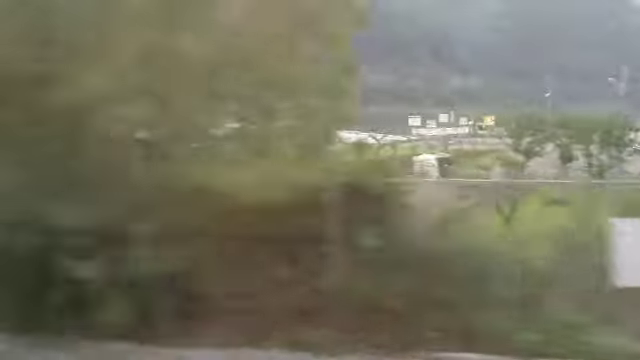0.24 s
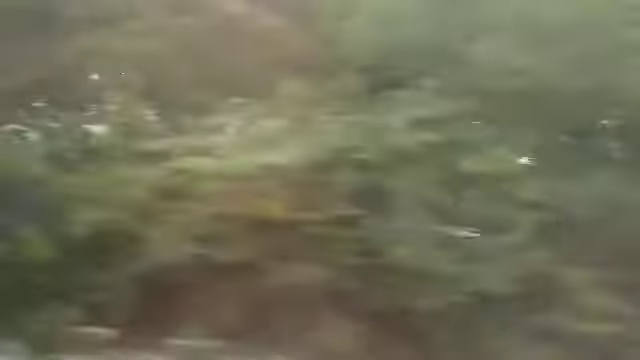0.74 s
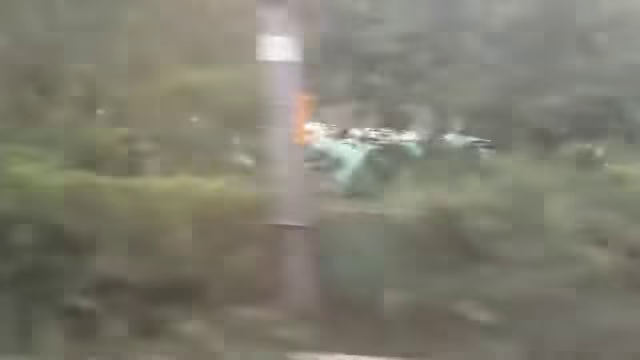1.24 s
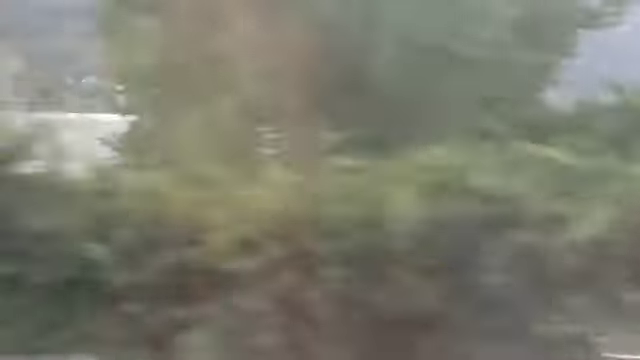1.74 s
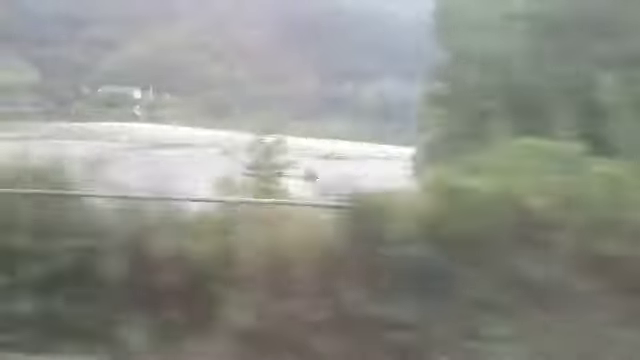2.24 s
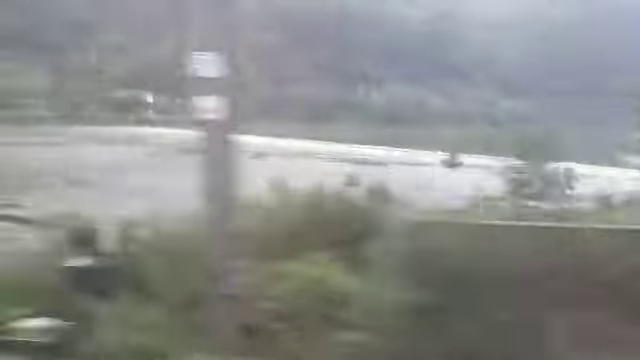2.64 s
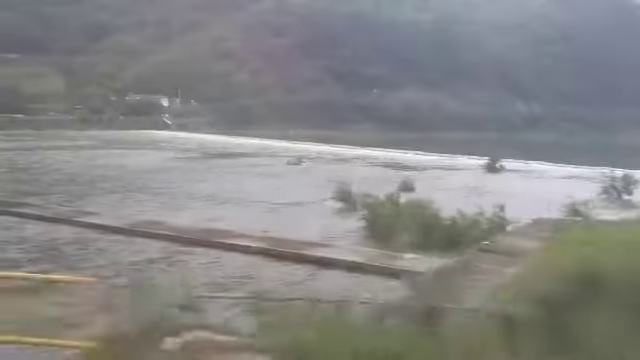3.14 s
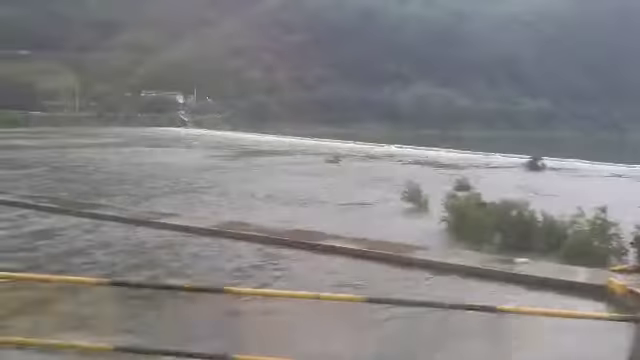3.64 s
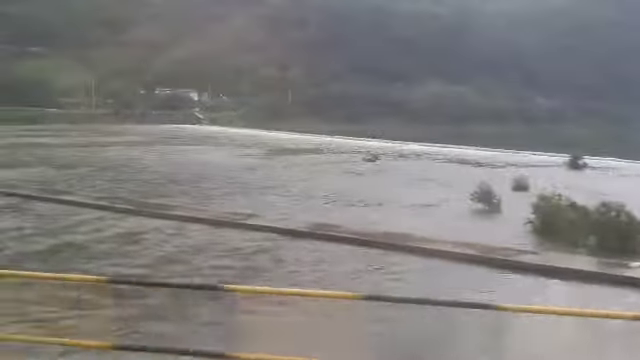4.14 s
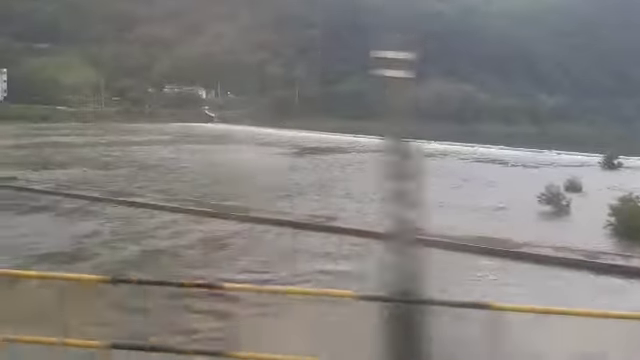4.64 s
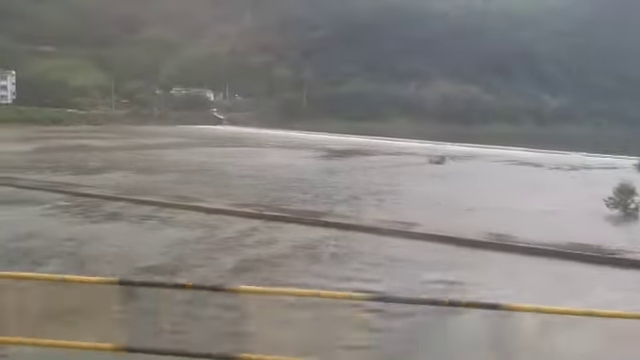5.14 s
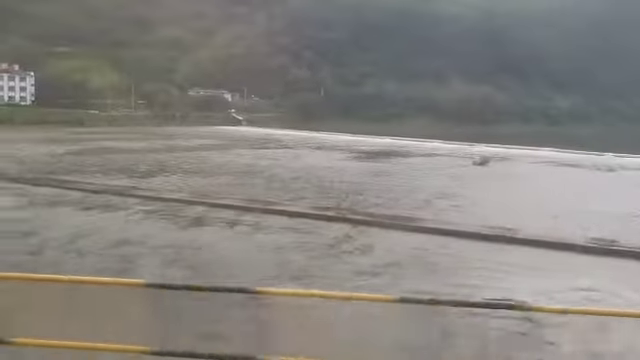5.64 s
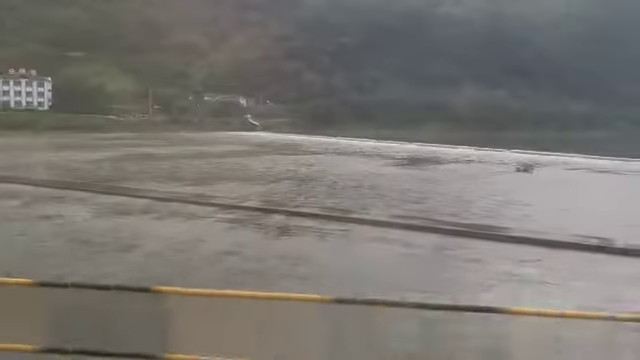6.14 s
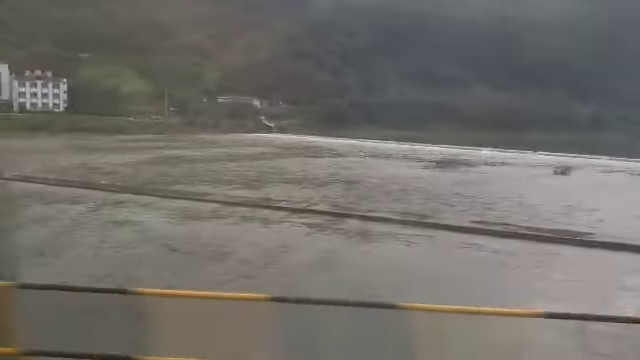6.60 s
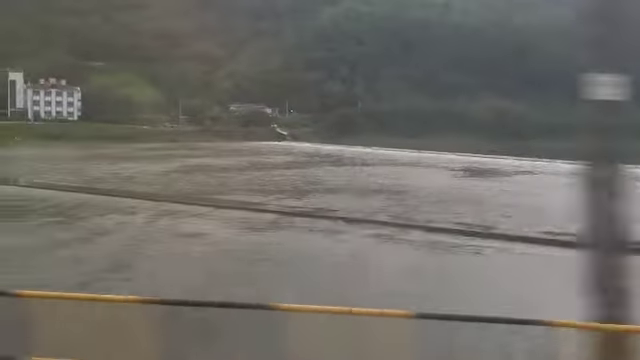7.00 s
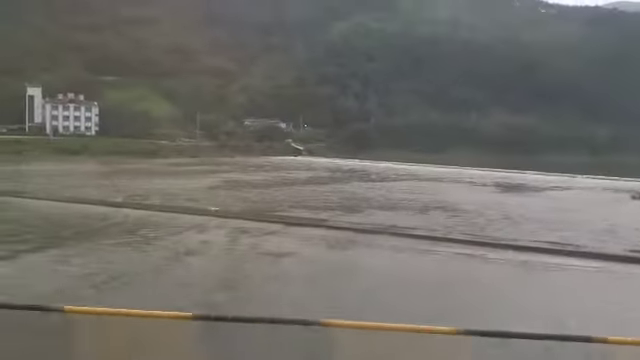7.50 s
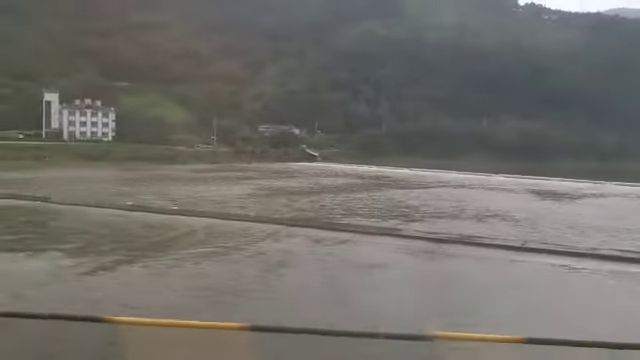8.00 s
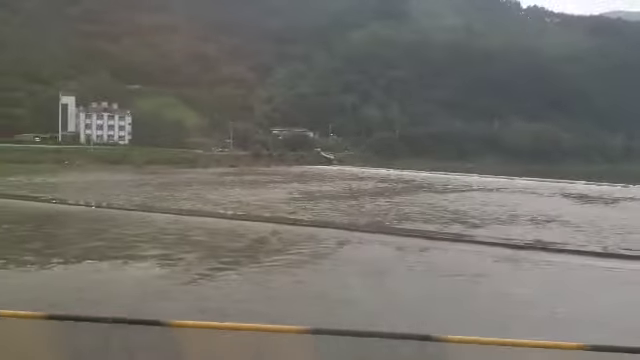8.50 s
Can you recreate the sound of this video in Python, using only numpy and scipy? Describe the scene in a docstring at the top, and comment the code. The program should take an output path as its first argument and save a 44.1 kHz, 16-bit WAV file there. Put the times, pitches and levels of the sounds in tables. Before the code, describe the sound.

Inside a fast passenger train, wheels on rails give a steady low rumble with uneven booming surges and a low drive hum.

```python
"""Passenger coach at speed, inside, running past trees and out along a river.
The wheels shake the body; its lowest air mode booms in surges under a steady rumble and rolling roar.
The drive hums on multiples of its shaft speed and eases after 3 s; a thin whine climbs.
Soft rustles and scuffs, a few ticks and short squeaks sound in the cabin."""
import sys
import numpy as np
from scipy import signal
from scipy.fft import rfft, irfft, next_fast_len
from scipy.io import wavfile
from scipy.ndimage import uniform_filter1d

SR = 44100
rng = np.random.default_rng(int(sys.argv[2]) if len(sys.argv) > 2 else 0)


def unload_audio(sound):
    """Save the sound as a 16-bit wav file, at the path given as the first command line argument."""
    columns = np.transpose(np.atleast_2d(sound))
    # keep every value between -1 and 1, then stretch to whole-number steps
    steps = np.round(np.clip(columns, -1, 1) * 32767)
    wavfile.write(sys.argv[1], SR, steps.astype(np.int16))


N = 386316
TIME_S = np.arange(N) / SR

# noise spectra: freq_hz, gain_db
RUSTLE_SPECTRUM = [(2000, -18), (3800, 0), (5400, 0), (7000, 1.5), (8500, -3.5), (10200, -3), (12000, -14)]
CONTACT_SPECTRUM = [(800, -4), (1600, -7), (2500, 6), (5000, -0.5), (8000, -1.5), (10500, 0.5),
                    (12000, -12)]
AIR_SPECTRUM = [(500, -2), (900, 4), (1130, 5), (1300, 2.5), (1550, 1.5), (2000, 1), (2300, 0),
                (2750, -2.5), (3300, -6.5), (4200, -11.5), (6000, -16), (11000, -27)]
ROAR_SPECTRUM = [(250, -13), (400, -2.5), (455, -4.5), (492, 3), (530, -1.5), (620, -3), (710, -4.5),
                 (860, -17.5), (1000, -21), (1500, -30.5), (3000, -58.5)]
RUMBLE_SPECTRUM = [(24, -23.5), (40, 1), (80, 4), (98, -2), (120, 1), (142, -2), (165, -8.5), (245, -5.5),
                   (305, -4), (355, -4), (390, -10.5), (450, -17.5), (700, -43)]

# cabin rustles: centre_s, level_db, half_length_s
RUSTLES = [(0.03, -61, 0.12), (1.547, -63, 0.11), (2.25, -64, 0.34), (2.665, -62, 0.11),
           (3.01, -65.5, 0.09), (3.532, -66, .05), (3.893, -60.5, 0.081), (4.418, -62.5, 0.11),
           (4.652, -59.5, .12), (5.046, -60.5, 0.098), (5.5, -65, .06), (8.593, -65, 0.085)]
# ticks of fittings, brushing scuffs: start_s, level_db, t60_s
TICKS = [(4.362, -50, 0.056), (5.4825, -56, 0.1), (6.248, -53, .03), (8.2358, -49, .014),
         (8.2602, -45, 0.025), (8.3266, -55, 0.014)]
SCUFFS = [(.557, -57.5, 0.41), (.757, -51.5, 0.26)]
# rubbing squeaks: centre_s, pitch_hz, width_hz, level_db, half_length_s
SQUEAKS = [(2.971, 1297, 23.53, -46, 0.038), (2.985, 4800, 2600, -60, 0.03), (3.03, 5800, 410, -68, .06),
           (4.461, 5360, 450, -68, .1), (4.67, 4394, 2400, -64, 0.11), (5.04, 4400, 2400, -60, .04),
           (7.652, 2696, 900, -58.5, 0.07)]
# upper partial of the climbing whine: time_s, level_db
WHINE_LEVEL = [(0, -62), (.7, -62), (2.1, -57.5), (2.6, -52), (3.1, -67), (4.4, -66), (5.3, -63),
               (5.8, -73.5), (8.76, -75.5)]
# faint steady whines: pitch_hz, level_db
STEADY_WHINES = [(1427, -71.5), (1965, -72.5), (2175, -72.5)]
# rolling roar, louder by the river: time_s, level_db
ROAR_LEVEL = [(.1, -46.5), (.5, -52), (.8, -48.5), (1.2, -49.5), (1.65, -46), (1.95, -50.5), (2.9, -46),
              (3.3, -49.5), (3.6, -50), (3.85, -47), (4.3, -45), (5.1, -43), (5.5, -41.5), (5.8, -44),
              (6.85, -42), (7.35, -43.5), (8.55, -42), (8.76, -38)]
# drive state: time_s, shaft_hz, load_fraction
DRIVE_STATE = [(0, 16.6, 0.87), (1.4, 16.73, 0.93), (2.9, 17, 0.94), (3.15, 17.2, 0.05), (8.76, 17.1, 0.27)]
# drive hum: shaft_multiple, loaded_db, eased_db
HUM_PARTIALS = [(6, -40.5, -55.5), (7, -44, -40.5), (8, -55, -36.5), (9, -28, -40), (10, -48, -49),
                (11, -45.5, -42.5), (12, -32, -40.5), (13, -46.5, -44), (16, -46.5, -57),
                (18, -58.5, -42.5), (19, -45.5, -44), (20, -40, -48), (21, -57, -57), (22, -47, -56),
                (24, -53, -52)]
# body rumble: time_s, level_db
RUMBLE_LEVEL = [(0, -33.5), (1, -34), (2.7, -30.5), (3.2, -35), (3.8, -35.5), (4.3, -30.5), (4.7, -33),
                (5.2, -34.5), (5.6, -31), (6.1, -30.5), (6.4, -33), (7, -30.5), (7.6, -29), (8.1, -31.5),
                (8.76, -31.5)]
# floor panel modes: pitch_hz, width_hz, relative_db
PANEL_MODES = [(139.94, 14, -3), (275.1, 17.4, -6)]
# track jolts: start_s, length_s, level_db
JOLTS = [(0.009, 0.043, -18.5), (0.155, 0.079, -20), (1.071, 0.046, -23), (1.31, 0.122, -19),
         (1.702, 0.042, -22), (1.786, 0.03, -23), (2.386, 0.091, -20), (2.529, 0.033, -20.5),
         (2.58, 0.027, -22), (2.8, 0.07, -17.5), (2.948, 0.15, -15), (3.302, 0.05, -23.5),
         (3.53, 0.029, -22.5), (3.86, 0.095, -19), (4.334, 0.2, -20), (5.163, 0.023, -25),
         (5.382, 0.2, -16), (5.758, 0.029, -23), (5.845, 0.061, -20), (6.031, 0.21, -19.5),
         (6.488, 0.11, -17.5), (6.748, 0.042, -24.5), (6.815, 0.052, -23), (6.92, 0.021, -26),
         (7.109, 0.084, -16), (7.286, 0.16, -23.5), (7.683, 0.18, -21), (7.885, 0.056, -26),
         (8, 0.056, -22.5), (8.496, 0.066, -19), (8.622, 0.15, -18)]


def undb(db):
    """Decibels to gain."""
    return 10 ** (np.asarray(db) / 20)


def curves(table):
    """Each column after time_s, interpolated per sample."""
    time_s, *columns = np.transpose(table)
    return [np.interp(TIME_S, time_s, column) for column in columns]


def unit_rms(x):
    """Scale to rms 1."""
    return x / np.sqrt(np.mean(x ** 2))


def noise():
    """White noise."""
    return rng.standard_normal(N)


def wander(rate_hz):
    """Random steps, smoothed twice; spread near 1."""
    hold = int(SR / rate_hz)
    steps = np.repeat(rng.standard_normal(2048), hold)[:N]
    return 1.3 * uniform_filter1d(uniform_filter1d(steps, hold), hold)


def swell(centre_s, level_db, half_length_s):
    """Gaussian envelope."""
    return undb(level_db) * np.exp(-((TIME_S - centre_s) / half_length_s) ** 2)


def colour(x, spectrum):
    """Filter by a spectrum, 12 dB/octave down past its ends; rms 1."""
    freq_hz, gain_db = np.transpose(spectrum)
    size = next_fast_len(N)
    bin_hz = np.arange(size // 2 + 1) * SR / size + 1
    gain = undb(np.interp(np.log(bin_hz), np.log(freq_hz), gain_db))
    skirts = np.minimum(bin_hz / freq_hz[0], 1) ** 2 * np.minimum(freq_hz[-1] / bin_hz, 1) ** 2
    return unit_rms(irfft(rfft(x, size) * gain * skirts, size)[:N])


def resonance(pitch_hz, width_hz, evenness):
    """Noise-driven mode, rms 1; evenness 0 beats fully, 1 is nearly level."""
    pole = np.exp((2j * np.pi * pitch_hz - np.pi * width_hz) / SR)
    mode = signal.lfilter([1], [1, -pole], signal.lfilter([1], [1, -pole], noise()))
    envelope = np.abs(mode) / np.mean(np.abs(mode))
    return unit_rms(mode.real / (envelope + 0.1) ** evenness)


def rustle(stir_db=-66.5, fade_db_per_s=0.42):
    """Cloth and trim slip in fine, uneven grains: soft swells over a fading stir."""
    stir = undb(stir_db - fade_db_per_s * TIME_S + 2.4 * wander(rate_hz=9.1))
    swells = sum(swell(*row) for row in RUSTLES)
    grains = noise() * undb(9 * np.repeat(rng.random(N // 32 + 1) ** 4, 32)[:N])
    return colour(grains, RUSTLE_SPECTRUM) * np.hypot(stir, swells) * undb(1.3 * wander(rate_hz=41))


def contacts(events):
    """Bright contact noise: instant onset, exponential decay."""
    envelope = 0
    for start_s, level_db, t60_s in events:
        age_s = np.maximum(TIME_S - start_s, 0)
        envelope += undb(level_db - 60 * age_s / t60_s) * (TIME_S >= start_s)
    return colour(noise(), CONTACT_SPECTRUM) * envelope


def squeaks():
    """Fittings rub as the body flexes; a clean slip sings, a rough one scrapes."""
    out = 0
    for centre_s, pitch_hz, width_hz, level_db, half_length_s in SQUEAKS:
        ratio = 1 + width_hz / pitch_hz
        band = [(pitch_hz / ratio ** 2, -30), (pitch_hz / ratio ** 0.5, 0),
                (pitch_hz * ratio ** 0.5, 0), (pitch_hz * ratio ** 2, -30), (8 * pitch_hz, -90)]
        slip = colour(resonance(pitch_hz, 2 * width_hz, evenness=0.51), band)
        out += slip * swell(centre_s, level_db, half_length_s)
    return out


def gear_whine(start_hz=1018, rise_hz_per_s=23, lower_db=-59.5, lower_fade_db_per_s=0.8):
    """Running gear: two partials at 3:4 climb among fainter steady whines."""
    upper_db, = curves(WHINE_LEVEL)
    pitch_hz = start_hz + rise_hz_per_s * TIME_S + 7 * wander(rate_hz=60)
    phase = 2 * np.pi * np.cumsum(pitch_hz) / SR
    upper = np.sin(phase) * undb(upper_db + 3 * wander(rate_hz=25) + 2 * wander(rate_hz=7))
    steady = sum(resonance(hz, width_hz=12, evenness=0.5) * undb(db) for hz, db in STEADY_WHINES)
    lower_gain = undb(lower_db - lower_fade_db_per_s * TIME_S + 2 * wander(rate_hz=7.9))
    return upper + np.sin(phase * 3 / 4) * lower_gain + steady


def air_rush(roar_rise_db, base_db=-53):
    """Air rushes along the windows; its level partly follows the roar."""
    level_db = base_db + 0.36 * roar_rise_db
    return colour(noise(), AIR_SPECTRUM) * undb(level_db + 0.4 * wander(rate_hz=14))


def rolling_roar(level_db, trim_db=1.05):
    """Rough rails roar through the walls."""
    return colour(noise(), ROAR_SPECTRUM) * undb(level_db + trim_db + 0.47 * wander(rate_hz=16))


def drive_hum():
    """Shaft harmonics, each wavering as the body carries it; load sets their balance."""
    shaft_hz, load = curves(DRIVE_STATE)
    turns = np.cumsum(shaft_hz * (1 + 0.00092 * wander(rate_hz=5.08))) / SR
    out = 0
    for multiple, loaded_db, eased_db in HUM_PARTIALS:
        rms_db = eased_db + load * (loaded_db - eased_db) + 1.1 * wander(rate_hz=8.4)
        phase = 2 * np.pi * (multiple * turns + rng.random()) + 0.14 * wander(rate_hz=8.2)
        out += undb(rms_db) * np.sin(phase)
    return np.sqrt(2) * out


def body_rumble(roar_rise_db, noise_trim_db=2.5):
    """Rough rails shake body and floor panels; the panels ring louder with the roar."""
    level_db, = curves(RUMBLE_LEVEL)
    panels = sum(resonance(hz, width_hz, evenness=0.082) * undb(db) for hz, width_hz, db in PANEL_MODES)
    body = colour(noise(), RUMBLE_SPECTRUM) * undb(noise_trim_db)
    return (body + panels * undb(0.59 * roar_rise_db)) * undb(level_db)


def cabin_boom(sway_db=-24, jolt_trim_db=2.5, lead_s=0.02, tail_s=0.031):
    """Uneven track rocks the body; the lowest air mode beats in and out and swells at each jolt."""
    envelope = undb(sway_db) * np.tanh(1.16 * np.abs(wander(rate_hz=15)))
    for start_s, length_s, level_db in JOLTS:
        progress = np.clip((TIME_S - start_s + lead_s) / (lead_s + length_s + tail_s), 0, 1)
        arch = np.sin(np.pi * progress ** 0.7)  # fast rise, slower fall
        envelope += arch * (undb(level_db + jolt_trim_db) - envelope)
    mode = resonance(pitch_hz=62.63, width_hz=8.8, evenness=0.93)
    # the mode cannot start or stop at once
    inertia = signal.butter(1, [42, 90], "band", fs=SR, output="sos")
    return signal.sosfilt(inertia, mode * envelope)


def scene(usual_roar_db=-46):
    """Mono mix at a window seat."""
    roar_db, = curves(ROAR_LEVEL)
    roar_rise_db = roar_db - usual_roar_db
    ride = cabin_boom() + body_rumble(roar_rise_db) + rolling_roar(roar_db) + air_rush(roar_rise_db)
    machinery = drive_hum() + gear_whine()
    cabin = rustle() + contacts(TICKS) + contacts(SCUFFS) + squeaks()
    return (ride + machinery + cabin)[None]


def record(dry):
    """Microphone: deepest bass and top cut."""
    low_hz, top_hz = 28, 11200
    highpass = signal.butter(2, low_hz, "high", fs=SR, output="sos")
    lowpass = signal.ellip(8, 0.2, 70, top_hz, fs=SR, output="sos")
    return signal.sosfilt(lowpass, signal.sosfilt(highpass, dry))


dry = scene()
out = record(dry)
unload_audio(out)
```